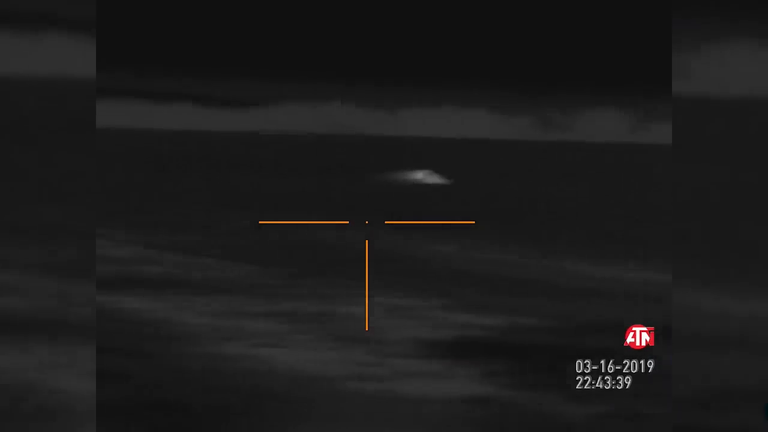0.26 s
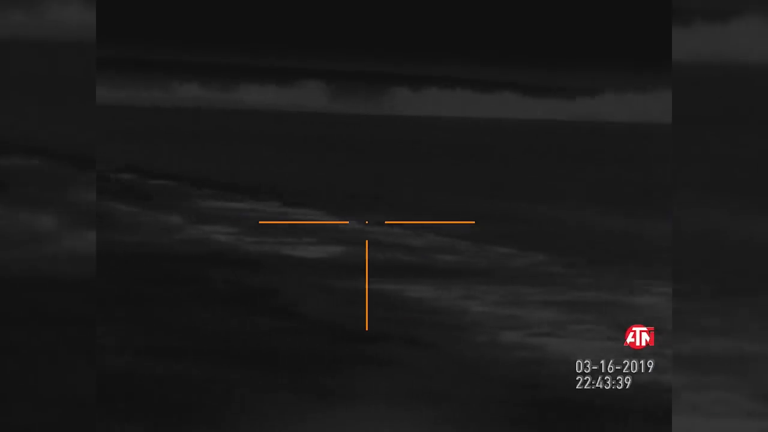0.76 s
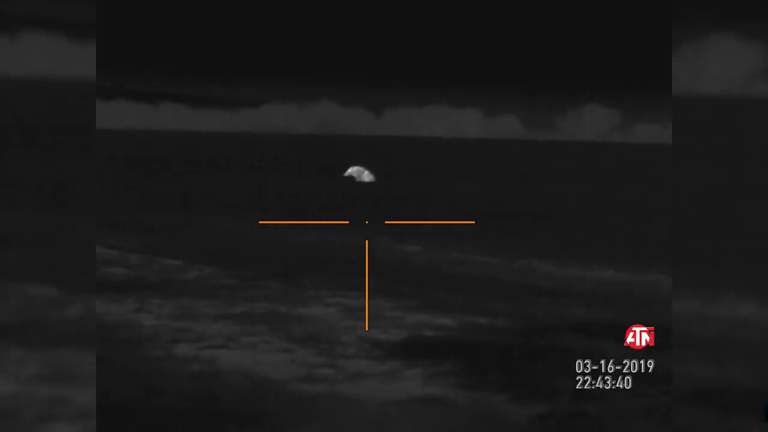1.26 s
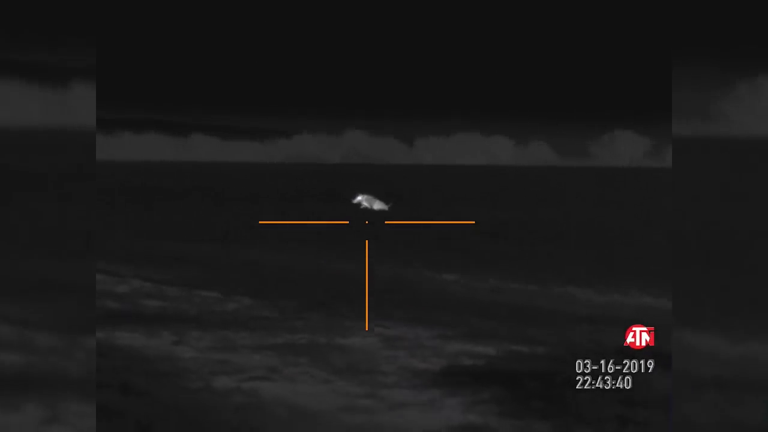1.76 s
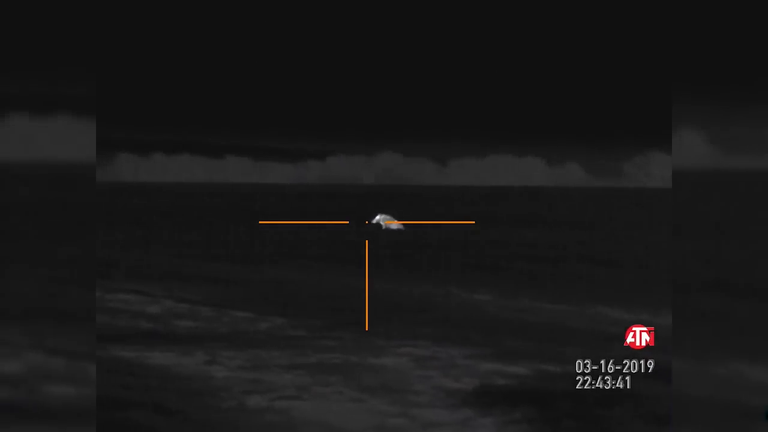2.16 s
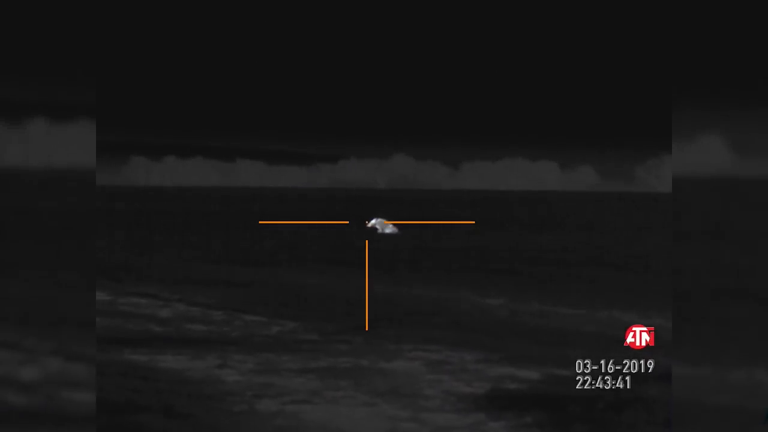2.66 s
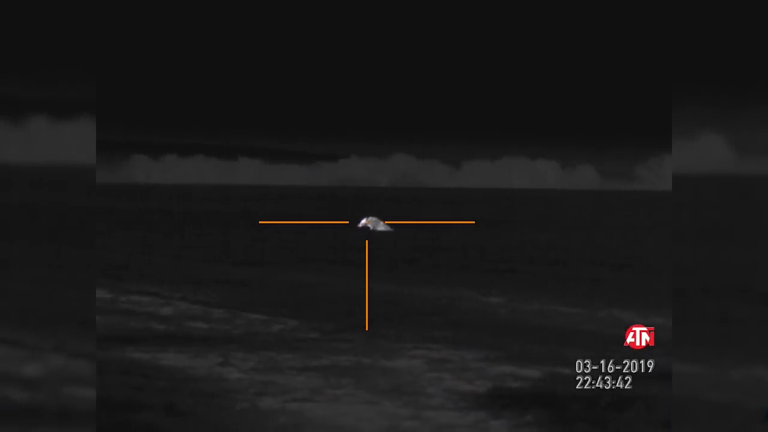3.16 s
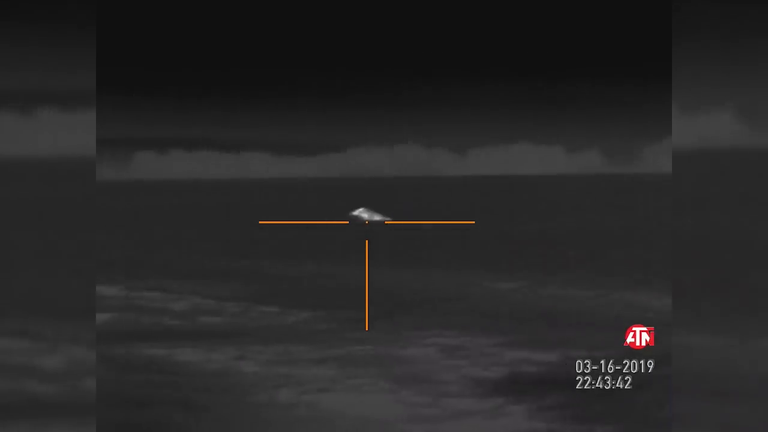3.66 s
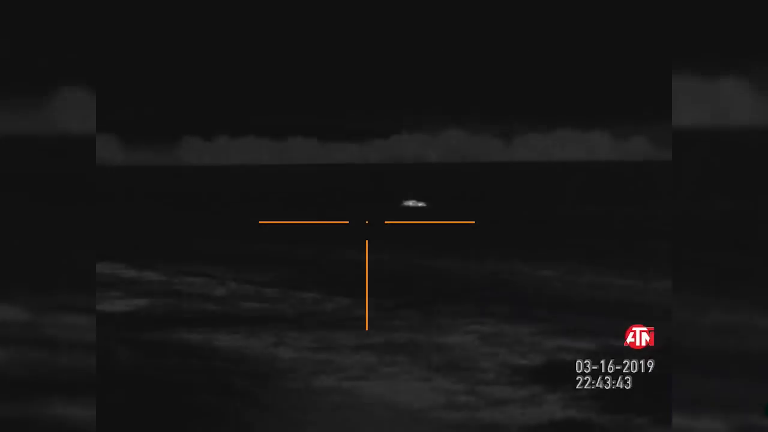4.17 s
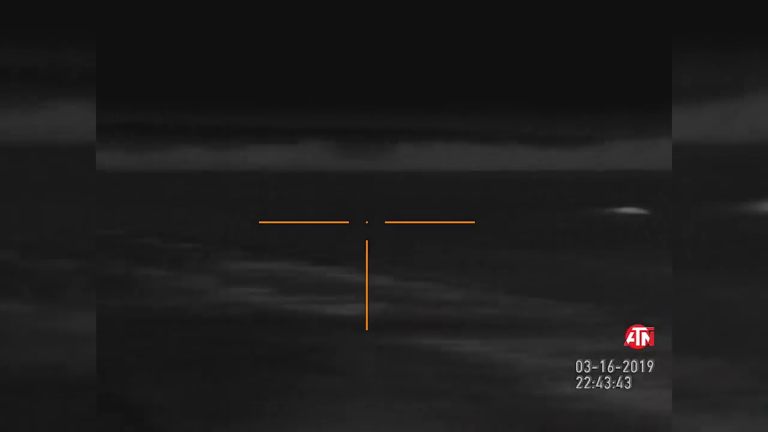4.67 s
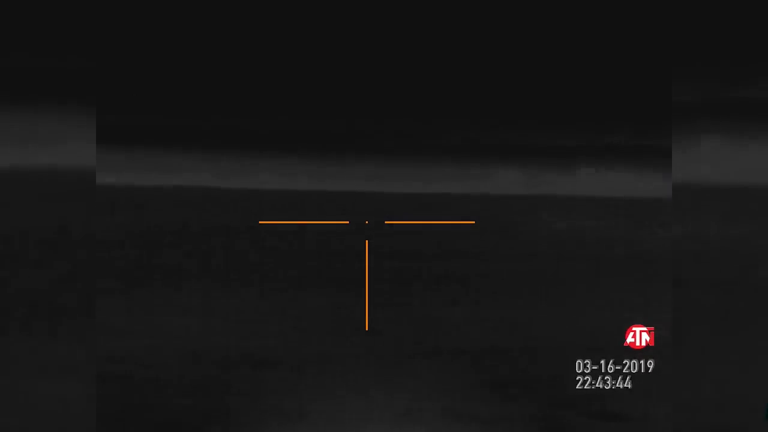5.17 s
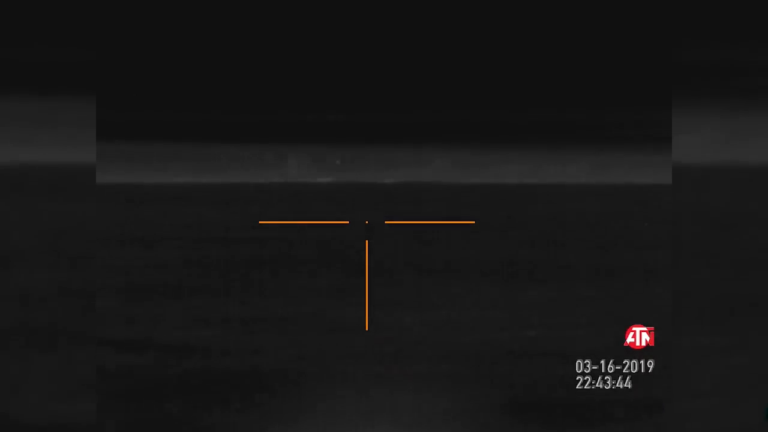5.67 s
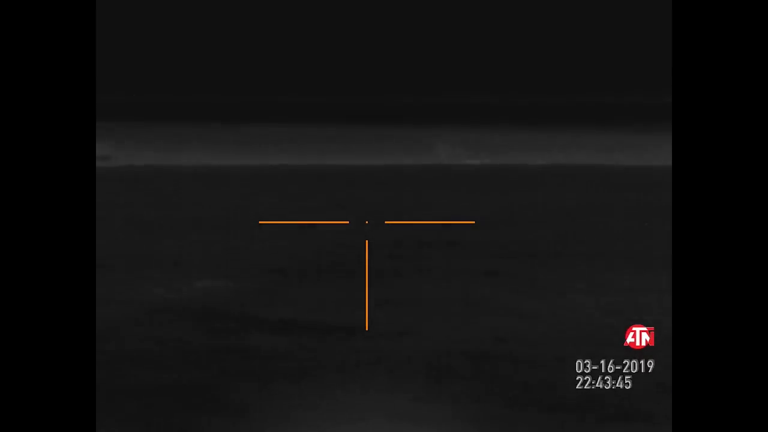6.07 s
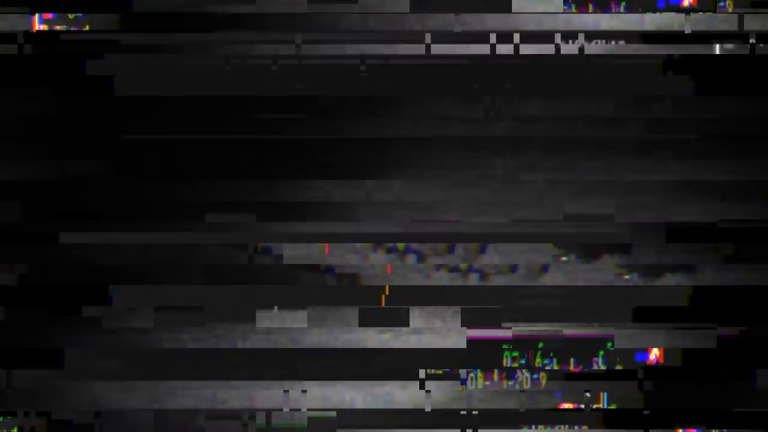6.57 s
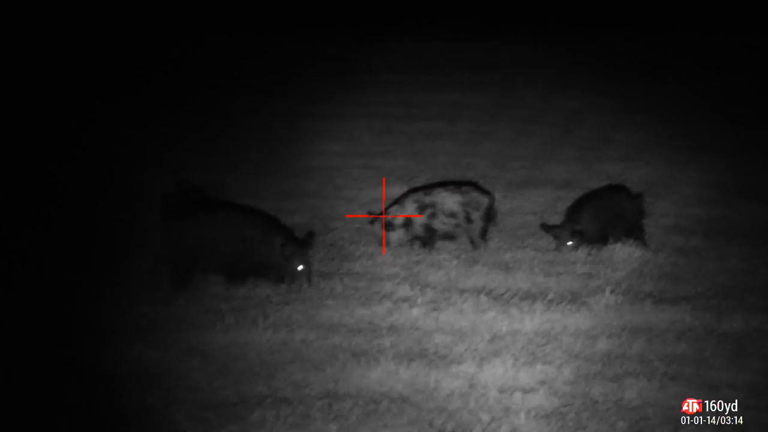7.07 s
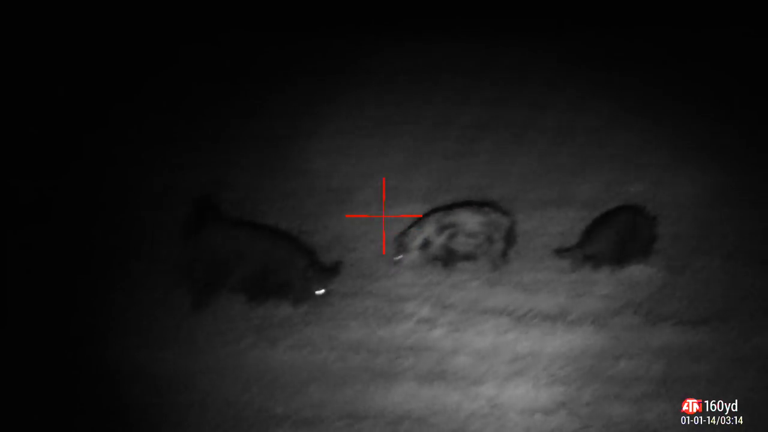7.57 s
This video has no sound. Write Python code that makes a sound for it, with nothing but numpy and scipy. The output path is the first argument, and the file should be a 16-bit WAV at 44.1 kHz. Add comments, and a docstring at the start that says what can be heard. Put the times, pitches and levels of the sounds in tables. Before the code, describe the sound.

Quiet handling clicks, a distorted close rifle shot, sinking hiss ending in a far slap, airy echo, then a pop and louder night air with ticks.

```python
"""One rifle shot on open farmland at night, heard from a sight mounted on the rifle: the blast overloads the
microphone. Before it, cloth slides and the action clicks: random pushes ring through the resonances of the
metal. The bullet's crack hisses back off the field as swelling, sinking noise until the slap and thud of the
hit return. An echo of noise bands dies away, treble first, with a thin whistle in it. After an instant of
silence and a pop, the scene changes to louder night air with a low hum, ticks and rustling."""
import sys
import numpy as np
from scipy import signal
from scipy.fft import rfft, irfft, next_fast_len
from scipy.io import wavfile

SR = 44100
rng = np.random.default_rng(int(sys.argv[2]) if len(sys.argv) > 2 else 0)


def output_pcm(signal):
    """Save a mono or channel-first signal as 16-bit PCM at the path in sys.argv[1].

    Samples are clipped to [-1, 1] before scaling.
    """
    pcm = np.clip(np.atleast_2d(signal).T, -1, 1) * 32767
    wavfile.write(sys.argv[1], SR, np.round(pcm).astype(np.int16))


N = 344871
TIME = np.arange(N) / SR

# when the rifle fires, the bullet lands and the scene changes to louder night air (s)
SHOT_S, HIT_S, SCENE_CHANGE_S = 3.4319, 3.8164, 6.148
LIGHT_T60_S, FIRM_T60_S = 0.008, 0.013  # a firmer contact sounds for longer

# Broad resonances of the rifle and sight. Each row: centre in Hz, width in Hz, boost in dB at full firmness.
BODY = [(1000, 240, 6), (2480, 300, 9), (3170, 400, -5.5), (3840, 350, 15.5), (4860, 630, -4),
        (6100, 800, 10), (9500, 2800, 3), (12900, 1500, 7.5)]
# Slides of the sleeve as the rifle is swung. Each row: middle in seconds, peak level in dB, half length in seconds.
SLIDES = [(.29, -70, .075), (.64, -70.5, .14), (1.9, -80, .14), (2.4, -84, .25), (3.3, -85, .2),
          (4.36, -67.5, .12), (4.65, -69, .06), (4.9, -65, .05), (5.12, -69.5, .08), (5.48, -70, .2)]
# Bright resonance shared by the pop, the ticks and the rustles. Each row: centre in Hz, width in Hz, boost in dB.
SHARPNESS = [(4490, 750, 7)]


def from_db(db):
    """Decibels to gain."""
    return np.exp(np.asarray(db) * np.log(10) / 20)


def rms_one(x):
    """Scale to rms 1."""
    return x / np.sqrt(np.mean(x ** 2) + 1e-20)


def dying(t60, t=TIME):
    """Gain that holds until t = 0, then loses 60 dB in t60 seconds."""
    return from_db(-60 * np.maximum(t, 0) / t60)


def swells(rows):
    """Gain of short bell-shaped movements."""
    return sum(from_db(db) * np.exp(-0.5 * ((TIME - s) / half) ** 2) for s, db, half in rows)


def flutter(per_s, depth_db, t=TIME):
    """A gain that wanders at random: new targets per_s times a second, joined by straight lines in dB."""
    steps = np.arange(0, N / SR + 1, 1 / per_s)
    return from_db(depth_db * np.interp(t, steps, rng.standard_normal(len(steps))))


def colour(spectrum, resonances, length):
    """Gain per frequency bin: a broad slope with resonant humps."""
    hz = np.maximum(np.arange(length // 2 + 1) * SR / length, 1)
    points = np.array(spectrum)
    db = np.interp(np.log(hz), np.log(points[:, 0]), points[:, 1])
    for centre, width, boost in resonances:
        db = db + boost / (1 + (2 * (hz - centre) / width) ** 2)
    return from_db(db)


def noise(spectrum, resonances=()):
    """Steady coloured noise of rms 1."""
    length = next_fast_len(N)
    white = rfft(rng.standard_normal(length))
    return rms_one(irfft(white * colour(spectrum, resonances, length), length)[:N])


def tones(rows):
    """Steady sines at their rms levels, each from a random phase."""
    return sum(np.sqrt(2) * from_db(db) * np.sin(2 * np.pi * (hz * TIME + rng.random())) for hz, db in rows)


def blow(spectrum, envelope, resonances=(), evenness=0.81, damping=0.2):
    """A short random push, rich in all pitches, rings through a coloured filter; it keeps the envelope's energy."""
    size = len(envelope)
    push = rfft(rng.standard_normal(size) * envelope, 2 * size)
    push = push / np.abs(push) ** np.clip(evenness, 0, 1)  # evens out the random spectrum
    log_gain = np.log(colour(spectrum, resonances, 2 * size))
    mirrored = np.r_[log_gain, log_gain[-2:0:-1]]
    body = np.exp(np.conj(signal.hilbert(mirrored)))[:size + 1]  # minimum phase: it rings only afterwards
    ringing = irfft(push * body)[:size]
    return rms_one(ringing * envelope ** damping) * np.sqrt(np.mean(envelope ** 2))


def burst(spectrum, t60, resonances=(), size=4096):
    """A blow whose push starts at full strength and dies away."""
    return blow(spectrum, dying(t60, TIME[:size]), resonances)


def add(out, s, sound):
    """Mix a short sound in at a moment in seconds."""
    start = round(s * SR)
    out[start:start + len(sound)] += sound[:N - start]


def quiet_air(start_db=-67, sink_db_per_s=0.46, gap_s=0.011):
    """Night air as coloured noise that sinks slowly over faint steady tones; it stops just before the louder air."""
    # Colour of the quiet air. Each row: frequency in Hz, relative level in dB.
    air_colour = [(15, -40), (25, -12), (69, -6.5), (129, -9.5), (151, -16.5), (188, -8.5), (358, -8),
                  (700, -1.5), (780, -4), (1170, -2.5), (1610, -9.5), (2110, -14.5), (2480, -16.5),
                  (2830, -18), (15400, -20.5)]
    # Faint whine. Each row: frequency in Hz, rms level in dB.
    whine = [(122, -89), (721, -85.5), (1439, -87), (2159, -87.5), (2880, -92), (10142, -93)]
    air = from_db(start_db - sink_db_per_s * TIME) * noise(air_colour)
    return (air + tones(whine)) * (TIME < SCENE_CHANGE_S - gap_s)


def handling(sleeve_rest_db=-88):
    """Cloth slides as noise, hands rub the rifle into its resonances and bump the stock with dull blows."""
    # Colour of the cloth. Each row: frequency in Hz, relative level in dB.
    sleeve_colour = [(200, -9.5), (1200, 1), (2500, -1.5), (4000, -1.5), (8500, 2.5), (12000, -5.5),
                     (16000, -9.5)]
    # Hands rubbing on the rifle. Each row: middle in seconds, peak level in dB, half length in seconds.
    rubs = [(1.85, -75, .04), (2.085, -61, 0.011), (2.275, -71, .016), (2.41, -73.5, .03),
            (4.63, -60.5, .018), (4.72, -66, .035)]
    # Soft bumps against the stock. Each row: start in seconds, level in dB.
    bumps = [(.093, -64), (4.92, -65.5)]
    # Colour of a bump. Each row: frequency in Hz, relative level in dB.
    bump_colour = [(40, -8), (120, 0), (300, -1), (900, -16), (4000, -45)]
    rub_colour = [(300, -12.5), (1600, 1.5), (4000, -5.5), (16000, -19)]  # Hz, dB

    sliding = (from_db(sleeve_rest_db) + swells(SLIDES)) * noise(sleeve_colour)
    rubbing = swells(rubs) * noise(rub_colour, BODY)
    out = (sliding + rubbing) * flutter(per_s=150, depth_db=2.5)
    for s, db in bumps:
        add(out, s, from_db(db) * burst(bump_colour, t60=0.067))
    return out


def small_clicks(count=28, above_sleeve_db=9.5, spread_db=2.5, low_hz=800, high_hz=4000, firmness=0.2):
    """Rows of faint touches at random moments, more frequent and stronger the harder the sleeve slides."""
    motion, chance = swells(SLIDES), rng.random((count, 3))
    at = np.searchsorted(np.cumsum(motion) / np.sum(motion), chance[:, 0])
    db = 20 * np.log10(motion[at]) + above_sleeve_db + spread_db * (2 * chance[:, 1] - 1)
    hz = low_hz * (high_hz / low_hz) ** chance[:, 2]
    return [(s, level, pitch, FIRM_T60_S, firmness) for s, level, pitch in zip(TIME[at], db, hz)]


def clicks(bounce_s=0.0063, bounce_db=-17.5):
    """Rows of the handled rifle's contacts; each touches once more, softly."""
    # Clicks of the handled rifle. Each row: start in seconds, level in dB, brightest frequency in Hz,
    # firmness from 0 to 1 (how strongly the body is shaken).
    contacts = [(.5842, -33.5, 8200, 0), (.696, -54.5, 1800, 0.1), (2.0150, -38.5, 4800, 1),
                (2.0922, -34.5, 5500, .9), (2.1024, -29, 4230, 1), (2.1080, -27.5, 4500, 1),
                (2.1171, -12.5, 6500, .7), (2.1247, -15, 4420, 0.96), (2.2948, -41.5, 3000, .84),
                (2.579, -54, 5470, .6), (3.1349, -33, 8330, 0.06), (4.3513, -43, 1800, 0),
                (4.674, -44, 3835, .9), (4.6803, -35.5, 4000, .8), (4.961, -50, 1932, .17),
                (4.9758, -45.5, 5000, .12), (5.1637, -36, 5000, .1), (5.1930, -37, 5013, 0),
                (5.4610, -38.5, 5960, .15)]
    rows = []
    for s, db, hz, firmness in contacts:
        t60 = LIGHT_T60_S + (FIRM_T60_S - LIGHT_T60_S) * firmness
        rows.append((s, db, hz, t60, firmness))
        rows.append((s + bounce_s, db + bounce_db, hz, t60, firmness))
    return rows


def knocks(rows, bass_db, mid_db, fall_db_per_octave, ring_db, ring_share):
    """Metal parts meet: a short crack through the rifle's body, then decaying sines that a gripping hand cuts short."""
    # Longer metallic ring. Each row: frequency in Hz, relative level in dB, t60 in seconds when not cut short.
    ring = [(2300, -31, .3), (2370, -26.5, .09), (2390, -31.5, 0.42), (2510, -31, .08), (3941, -37.5, 0.32),
            (4060, -37.5, 0.35), (4491, -36, .08), (5486, -30, .075), (5686, -30, .06), (8690, -36.5, .035)]
    out, t = np.zeros(N), TIME[:SR // 2]
    modes = []
    for hz, mode_db, mode_t60 in ring:
        mode = from_db(mode_db) * dying(mode_t60 * ring_share, t) * np.sin(2 * np.pi * hz * t)
        modes.append(mode * flutter(per_s=120, depth_db=3.5, t=t))  # loose parts make the ring waver
    modes = np.array(modes)

    for s, db, hz, t60, firmness in rows:
        bright_side = [(hz, 0), (2 * hz, -fall_db_per_octave / 2), (8 * hz, -3 * fall_db_per_octave)]
        contact = [(60, bass_db), (hz / 10, mid_db)] + bright_side
        body = [(centre, width, boost * firmness) for centre, width, boost in BODY]
        strengths = from_db(db + ring_db + rng.normal(0, 2, (len(ring), 1)))
        add(out, s, from_db(db) * burst(contact, t60, body))
        add(out, s, firmness * np.sum(strengths * modes, axis=0))
    return out


def handled_rifle():
    """Contacts and faint touches on a held rifle: soft bass and a weak ring, cut short."""
    return knocks(clicks() + small_clicks(), bass_db=-17.5, mid_db=-22.5, fall_db_per_octave=15,
                  ring_db=-13, ring_share=0.3)


def recoil():
    """Hard knocks of the action as it fires and recoils: fuller, with a strong and nearly uncut ring."""
    # Knocks of the action. Each row: start in seconds, level in dB, brightest frequency in Hz,
    # t60 of the push in seconds, firmness from 0 to 1.
    action = [(3.4277, -14, 4490, .028, .2), (3.4480, -11, 4960, 0.033, .6), (3.4553, -18, 5000, 0.042, .8),
              (3.4703, -24, 2600, 0.032, .7), (3.4790, -17.5, 6000, .038, .3),
              (3.4818, -7, 4600, 0.016, .18), (3.4872, -21.5, 5600, 0.024, .7),
              (3.4940, -30, 2400, 0.017, 1), (3.5408, -22, 2950, 0.013, 0.84)]
    return knocks(action, bass_db=-14.5, mid_db=-12.5, fall_db_per_octave=10.5, ring_db=5, ring_share=0.95)


def shot(strike_lead_s=0.0037, strike_hz=2450, strike_db=-4, strike_t60=0.03,
         blast_db=5.5, blast_hold_s=0.0064, blast_t60=0.0135, gas_db=-18.5, gas_t60=0.17):
    """The firing pin rings the action as a sine; the muzzle blast holds, collapses and leaves a tail of gas."""
    # Colour of the muzzle blast. Each row: frequency in Hz, relative level in dB.
    blast_colour = [(30, -17), (90, -15.5), (170, -19.5), (420, -11.5), (650, -6.5), (1000, -6), (1450, -5),
                    (2100, -1), (3100, -7.5), (4200, 1), (7500, -1), (11000, -.5), (16000, -10)]
    # Narrow humps in the blast's colour. Each row: centre in Hz, width in Hz, boost in dB.
    blast_humps = [(290, 99.9, 7.5), (560, 110, 6), (900.5, 190, 8), (1180, 140, 7.5), (1861, 99, 8.5),
                   (2160, 198, 10), (2550, 57, 6), (5230, 500, 4.5), (7193, 640, 5), (9224, 250, 6)]
    out, t = np.zeros(N), TIME[:SR // 2]
    strike = from_db(strike_db) * dying(strike_t60, t) * np.sin(2 * np.pi * strike_hz * t)
    add(out, SHOT_S - strike_lead_s, strike)
    blast = from_db(blast_db) * dying(blast_t60, t - blast_hold_s)
    gas = from_db(gas_db) * dying(gas_t60, t)
    add(out, SHOT_S, blow(blast_colour, np.hypot(blast, gas), blast_humps, evenness=0.65))
    return out


def scatter_level(level_db=-29.5, fall_db_per_s=15.5, swell_after_s=0.17, swell_rise_s=0.016, swell_db=12):
    """Gain of the scattered crack: a smooth swell, then a steady fall as the bullet draws away."""
    since = TIME - SHOT_S - swell_after_s
    still_low = 0.5 - 0.5 * np.tanh(0.5 * since / swell_rise_s)
    return from_db(level_db - swell_db * still_low - fall_db_per_s * np.maximum(since, 0))


def flight(near_s=3.2, far_s=3.67, end_t60=0.033, bounce=0.5, streak_hz=6000):
    """The shock wave scatters off the stubble, changing colour with distance, and stops when the bullet does."""
    # Colour of the crack off near ground. Each row: frequency in Hz, relative level in dB.
    near_colour = [(60, -24), (400, -17.5), (900, -10), (2500, -2.5), (4500, 1.5), (7000, -2.5),
                   (10000, -6.5), (16000, -16)]
    # Colour of the crack off far ground. Each row: frequency in Hz, relative level in dB.
    far_colour = [(60, -42), (220, -21), (440, -28), (750, -17), (1300, -14.5), (2500, -5), (3700, -4.5),
                  (4600, -1), (6300, -3.5), (7600, -0.5), (8800, -8.5), (9700, -18.5), (15500, -30)]
    far = np.clip((TIME - near_s) / (far_s - near_s), 0, 1)
    scatter = np.sqrt(1 - far) * noise(near_colour) + np.sqrt(far) * noise(far_colour)

    # a second path lags more and more, so streaks slide down through the treble
    lag_s = np.interp(TIME, [3.55, 3.82], [0.00087, 0.00103])
    treble = signal.sosfiltfilt(signal.butter(2, streak_hz, "high", fs=SR, output="sos"), scatter)
    swirl = scatter + bounce * np.interp(TIME - lag_s, TIME, treble)

    ending = dying(end_t60, np.minimum(TIME - HIT_S, 1))
    return swirl * scatter_level() * flutter(per_s=400, depth_db=1.3) * (TIME > SHOT_S) * ending


def hit(crack_db=-13, crack_t60=0.012, thud_db=-30, thud_t60=0.026):
    """The bullet lands far off: a bright burst for the slap over a low one for the hollow thud."""
    # Colour of the slap. Each row: frequency in Hz, relative level in dB.
    slap_colour = [(100, -26), (850, -19), (1400, -4), (2700, 3), (3600, -7), (5000, -1), (7500, -3.5),
                   (10000, -16.5), (16000, -43)]
    # Colour of the thud. Each row: frequency in Hz, relative level in dB.
    thud_colour = [(40, -34), (90, -12), (190, -2), (400, -2), (600, -13), (1000, -29), (4000, -64)]
    out = np.zeros(N)
    add(out, HIT_S, from_db(crack_db) * burst(slap_colour, crack_t60))
    add(out, HIT_S, from_db(thud_db) * burst(thud_colour, thud_t60))
    return out


def echo(start_db=-43, fall_db_per_s=33, air_db_per_s_per_khz=4.5, late_db=-17, late_t60=5.9):
    """The field keeps answering in noise bands; the longer the path, the more treble the air takes."""
    # Colour of the echo at its start. Each row: frequency in Hz, relative level in dB.
    echo_colour = [(35, -56), (60, -20), (298, -12), (350, -9), (393, -18), (496, -11), (544, -16),
                   (771, -10), (929, -10), (1090, -7.5), (3490, -1.5), (7000, -4), (15400, -27)]
    out, wash = np.zeros(N), noise(echo_colour)
    age = np.maximum(TIME - HIT_S, 0)
    edges = np.geomspace(60, 16000, num=13)  # Hz
    for low, high in zip(edges, edges[1:]):
        band = signal.sosfilt(signal.butter(2, [low, high], "band", fs=SR, output="sos"), wash)
        centre_khz = np.sqrt(low * high) / 1000
        air_db = air_db_per_s_per_khz * centre_khz * age
        near = from_db(-fall_db_per_s * age - air_db)
        distant = from_db(late_db - 60 * age / late_t60 - air_db / 2)
        out += np.roll(band, rng.integers(N)) * np.hypot(near, distant)  # the shift unties the bands
    return from_db(start_db) * out * (TIME > HIT_S)


def whistle(hz=3200, width_hz=170, peak_db=-73, rise_s=0.08, hold_s=0.74, t60=3.0):
    """A thin whistle of narrow noise hangs in the echo, then dies away."""
    age = TIME - HIT_S
    envelope = from_db(peak_db) * np.clip(age / rise_s, 0, 1) * dying(t60, age - hold_s)
    lower_side = [(hz - 4 * width_hz, -35), (hz - width_hz, -9)]
    upper_side = [(hz + width_hz, -9), (hz + 4 * width_hz, -35)]
    return envelope * noise(lower_side + [(hz, 0)] + upper_side)


def loud_air(start_db=-42.5, rise_db_per_s=0.66, fade_in_s=0.023):
    """Louder night air as coloured noise that fades in quickly and creeps up, over a low hum of steady sines."""
    # Colour of the loud air. Each row: frequency in Hz, relative level in dB.
    air_colour = [(24, -87), (40, -57), (57, -43), (71, -32.5), (103, -22.5), (212, -13.5), (266, -14),
                  (349, -5.5), (386, -10), (471, 2), (520, -1), (923, 3), (1240, -4), (1640, -5.5),
                  (2320, -17), (4330, -19.5), (6130, -27), (13900, -33), (15400, -34)]
    # Low hum. Each row: frequency in Hz, rms level in dB.
    hum = [(80.7, -71.5), (129.2, -73), (209.9, -71), (301.5, -73.5)]
    since = np.maximum(TIME - SCENE_CHANGE_S, 0)
    gain = from_db(start_db + rise_db_per_s * since) * (1 - np.exp(-since / fade_in_s))
    return (gain * noise(air_colour) + tones(hum)) * (TIME >= SCENE_CHANGE_S)


def pop(start_s=6.1519, level_db=-11, t60=0.0098):
    """A single short burst with a bright resonance, as the louder air fades in."""
    # Colour of the pop. Each row: frequency in Hz, relative level in dB.
    pop_colour = [(30, -50), (60, -35), (150, -26), (280, -4.5), (470, 9), (700, -10), (1250, 4),
                  (1750, -1.5), (2300, -12.5), (3200, -18), (4000, -4.5), (5100, 1.5), (6500, -12),
                  (16000, -37.5)]
    out = np.zeros(N)
    add(out, start_s, from_db(level_db) * burst(pop_colour, t60, SHARPNESS))
    return out


def dry_ticks():
    """Dry ticks: very short bright bursts."""
    # Each row: start in seconds, level in dB, t60 of the push in seconds.
    ticks = [(6.1895, -42, .006), (7.1278, -18.5, 0.0073), (7.1963, -19.5, 0.0092)]
    # Colour of a tick. Each row: frequency in Hz, relative level in dB.
    tick_colour = [(300, -27.5), (2200, -15), (3200, -3), (4500, -0.5), (6000, -7), (10000, -28.5),
                   (16000, -36)]
    out = np.zeros(N)
    for s, db, t60 in ticks:
        add(out, s, from_db(db) * burst(tick_colour, t60, SHARPNESS))
    return out


def grass():
    """Rustles in the grass: brief swells of fluttering noise."""
    # Each row: middle in seconds, peak level in dB before the flutter, half length in seconds.
    rustles = [(6.218, -47.5, 0.015), (6.258, -38.5, .0067), (6.280, -40, 0.0085), (6.64, -48, .011),
               (7.359, -45, .016), (7.452, -45, .03), (7.77, -48, 0.018)]
    # Colour of the grass. Each row: frequency in Hz, relative level in dB.
    grass_colour = [(500, -19), (1800, 3.5), (3000, -9), (4000, 0.5), (6000, -6.5), (9000, -20),
                    (15000, -32)]
    return swells(rustles) * noise(grass_colour, SHARPNESS) * flutter(per_s=400, depth_db=4)


def scene():
    """One microphone, the same in both ears."""
    rifle = handling() + handled_rifle() + recoil() + shot()
    field = flight() + hit() + echo() + whistle()
    night = quiet_air() + loud_air() + pop() + dry_ticks() + grass()
    mono = rifle + field + night
    return np.stack([mono, mono])


def record(dry, hiss_db=-79, low_cut_hz=42, top_cut_hz=15900):
    """The blast is clipped flat and loses its deepest bass; a very faint steady hiss, independent in left and
    right, lies over everything; the top is cut."""
    clipped = np.clip(dry, -0.95, 0.95)
    thinned = signal.sosfilt(signal.butter(2, low_cut_hz, "high", fs=SR, output="sos"), clipped)
    hissy = thinned + from_db(hiss_db) * rng.standard_normal(dry.shape)
    return signal.sosfilt(signal.ellip(10, 0.2, 90, top_cut_hz, fs=SR, output="sos"), hissy)


dry = scene()
out = record(dry)
output_pcm(out)
```